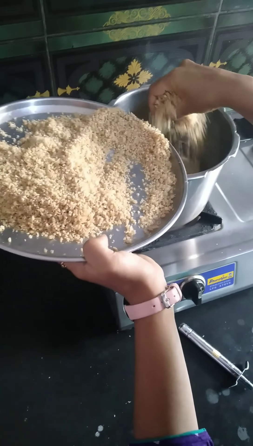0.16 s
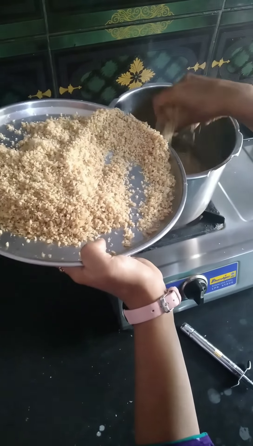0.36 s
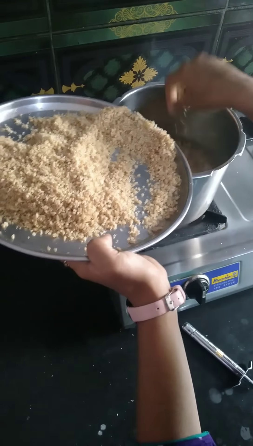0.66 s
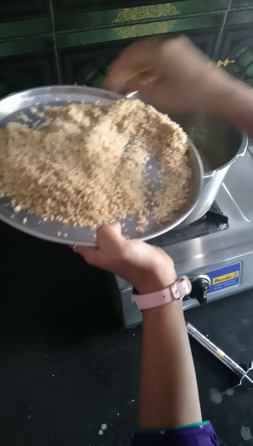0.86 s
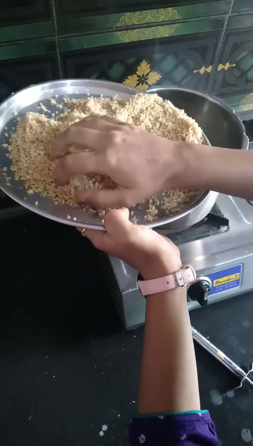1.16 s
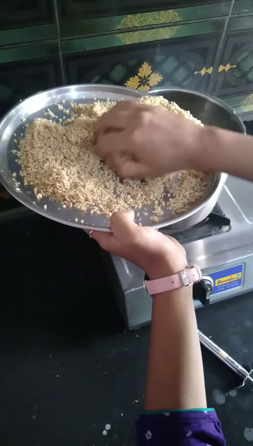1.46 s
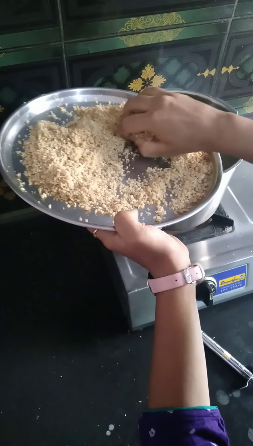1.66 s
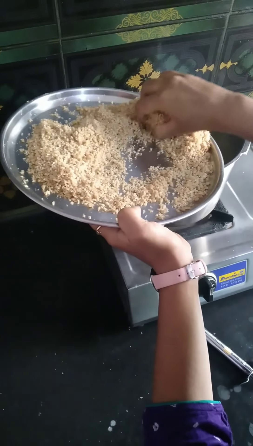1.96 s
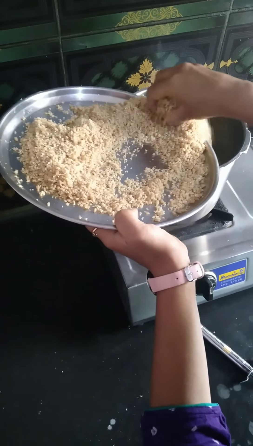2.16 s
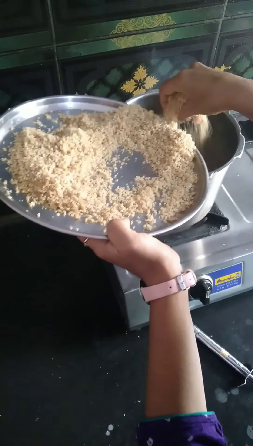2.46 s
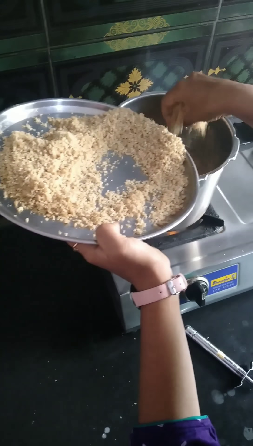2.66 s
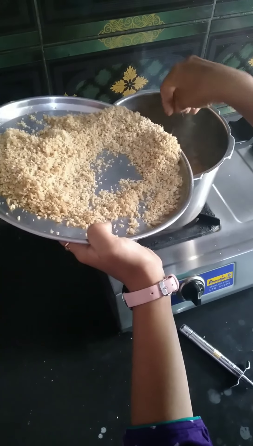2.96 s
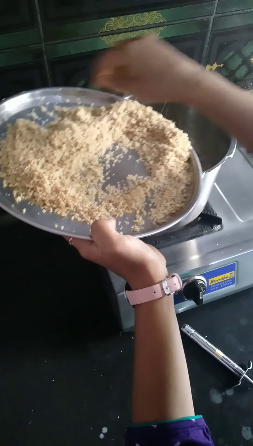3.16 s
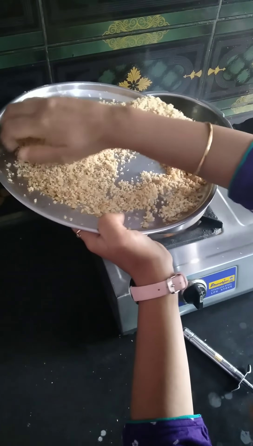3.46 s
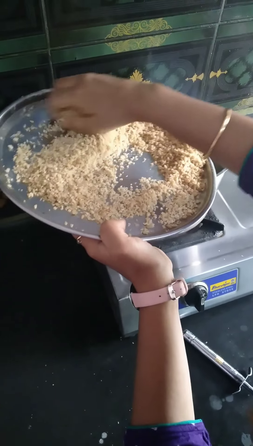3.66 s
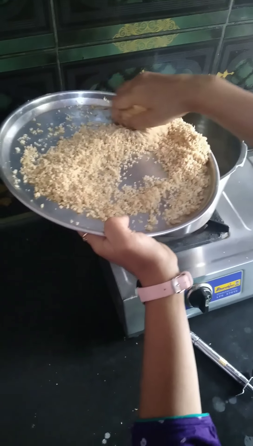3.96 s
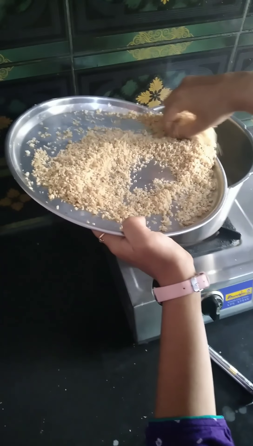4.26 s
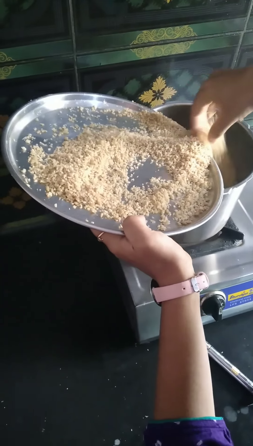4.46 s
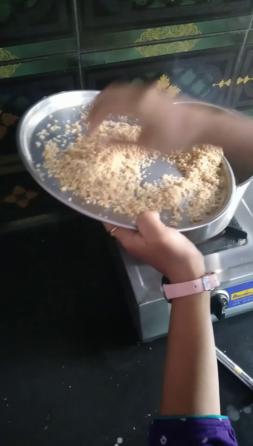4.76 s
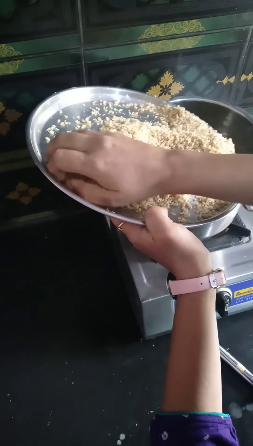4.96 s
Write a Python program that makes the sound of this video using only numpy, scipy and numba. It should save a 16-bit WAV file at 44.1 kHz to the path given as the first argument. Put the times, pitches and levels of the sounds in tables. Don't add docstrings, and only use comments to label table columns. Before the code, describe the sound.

Coarse grain is pushed by hand off a steel plate into a pot of water, fizzing brightly, with scraping fingers and hard metallic knocks.

```python
import sys
import numpy as np
from scipy import signal
from scipy.fft import rfft, irfft, next_fast_len
from scipy.io import wavfile
from scipy.ndimage import uniform_filter1d
from numba import njit

SR = 44100
rng = np.random.default_rng(int(sys.argv[2]) if len(sys.argv) > 2 else 0)


def nominal_scale(level):
    x = np.asarray(level, float) / 20
    return 10 ** x


def persist_wave(psi):
    counts = np.round(np.clip(psi, -1, 1) * 32767).astype(np.int16)
    wavfile.write(sys.argv[1], SR, np.atleast_2d(counts).T)


N = 225457
T = np.arange(N) / SR
PORT_LAG = 9
SIDES = np.array([[1], [-1]])


def level(x, db):
    return x * nominal_scale(db) / np.sqrt(np.mean(x ** 2))


def decay(t, t60):
    return np.exp(-np.log(1000) * t / t60)


def burst(s, db, rise_s, fall_s):
    return nominal_scale(db - 20 * np.where(T < s, (s - T) / rise_s, (T - s) / fall_s))


def walk(rate_hz):
    k = int(SR / rate_hz)
    steps = np.repeat(rng.standard_normal(N // k + 1), k)
    return 1.3 * uniform_filter1d(uniform_filter1d(steps, k), k)[:N]


def band(x, hz, width_hz):
    hz = min(hz, .45 * SR)
    return signal.lfilter(*signal.iirpeak(hz, hz / width_hz, fs=SR), x)


@njit
def moving_band(x, hz, width_hz):
    y, b, l = np.empty(len(x)), 0., 0.
    for i in range(len(x)):
        g, k = np.tan(np.pi * hz[i] / SR), width_hz[i] / hz[i]
        v = (b + g * (x[i] - l)) / (1 + g * (g + k))
        b, l, y[i] = 2 * v - b, l + 2 * g * v, k * v
    return y


def colour(x, table):
    hz, db = np.transpose(table)
    size = next_fast_len(N)
    log_f = np.log(np.arange(size // 2 + 1) * SR / size + 1)
    return irfft(rfft(x, size) * nominal_scale(np.interp(log_f, np.log(hz), db)), size)[..., :N]


def ring(modes, size):
    t, out = T[:size], 0
    for hz, db, t60 in modes:
        strength = nominal_scale(db + 1.5 * rng.standard_normal())
        out = out + strength * np.sin(2 * np.pi * hz * t) * decay(t, t60)
    return out


@njit
def add_bubbles(out, start, hz, cycles, size, glide):
    for j in range(len(start)):
        w, phase, a = 2 * np.pi * hz[j] / SR, 0., size[j]
        fade = np.exp(-hz[j] / SR / cycles[j])
        for i in range(start[j], min(len(out), start[j] + int(5 * cycles[j] * SR / hz[j]))):
            phase += w
            w, a = min(w * (1 + glide * hz[j] / SR / cycles[j]), 2.8), a * fade
            out[i] += a * np.sin(phase)


def bubbles(low_hz, high_hz, cycles, spread_db, glide, apart, count):
    out, r = np.zeros(N), rng.random((count, 4))
    start = (r[:, 0] * N).astype(np.int64)
    hz = low_hz * (high_hz / low_hz) ** r[:, 1]
    biggest = np.minimum(-np.log(1 - r[:, 3]), 4.5)
    add_bubbles(out, start, hz, cycles * (.5 + r[:, 2]), nominal_scale(spread_db * biggest), glide)
    own = np.array([np.roll(out, N // 3), np.roll(out, -N // 3)])
    return level(np.array([np.roll(out, PORT_LAG), out]) + apart * own, 0)


# f [Hz], density [dB per Hz]
FIZZ = [(1760, -33), (3000, -11), (3260, -13), (3620, -15), (6170, -5), (8520, 5.5), (11400, -3.5),
        (15100, -3), (16000, -17)]
# t [s], flow level [dB], share of coarse lumps [dB]
FLOW = [(0.0, -35.5, -10), (0.42, -33.5, -12), (0.55, -39, -9), (0.61, -32, -15), (0.76, -45, -8),
        (0.9, -51, -7), (1.95, -49.5, -8), (2.11, -43, -6), (2.2, -33, -10), (2.78, -39, -8),
        (2.91, -34, -14), (3.1, -50, -20), (3.5, -50, -6), (3.75, -44, -14), (4.08, -48, -11),
        (4.25, -38, -7), (4.5, -31.5, -9), (4.8, -50, -5)]
# t [s], peak level [dB], 20 dB rise [s], 20 dB fall [s]
SPURTS = [(.0, -34, .05, .08), (.075, -36, .05, .05), (.32, -37, .05, .06), (1.122, -41, .004, .1),
          (1.57, -49, .2, .2), (2.39, -37, .05, .15), (2.9, -36, .06, .06), (3.73, -41, .12, .14),
          (3.84, -35, .06, .06), (4.155, -39, .03, .15), (4.2, -37, .02, .15), (4.33, -31, .004, .3),
          (4.61, -37, .04, .12), (4.84, -30, .004, .12), (5.11, -44, .15, .1)]


def shower():
    s, flow_db, lump_db = np.transpose(FLOW)
    pour_db = np.interp(T, s, flow_db)
    flow = np.sqrt(nominal_scale(2 * pour_db) + sum(burst(*spurt) ** 2 for spurt in SPURTS))
    shake = sum(burst(knock[0], knock[1], .005, .15) for knock in KNOCKS)
    heavy = np.clip((pour_db + 49) / 11, 0, 1)
    lumpy = np.clip((pour_db + 53.5) / 9, 0, 1)

    fizz = bubbles(low_hz=2860, high_hz=15600, cycles=1.37, spread_db=3.6, glide=.1, apart=1.2, count=14000)
    fizz = level(colour(fizz, FIZZ), -0.7) * nominal_scale(1.7 * walk(40))

    large = bubbles(low_hz=1700, high_hz=5390, cycles=2.97, spread_db=3.3, glide=.178, apart=1.1, count=5000)
    lumps = flow * nominal_scale(np.interp(T, s, lump_db) + 2.0) + nominal_scale(-28) * shake
    large = large * lumps * nominal_scale(2.73 * walk(30))

    slosh = bubbles(low_hz=582, high_hz=1916, cycles=2.7, spread_db=4.0, glide=.146, apart=1.1, count=3000)
    slosh = slosh * (heavy * nominal_scale(-55) + nominal_scale(-22) * shake) * nominal_scale(2.2 * walk(15))

    patter = rng.standard_normal(N) * nominal_scale(3.0 * walk(30))
    drum = signal.fftconvolve(patter, ring(STEEL[:11], size=SR // 2))[:N]
    drum = level(drum, 0) * (heavy * nominal_scale(-53.5) + nominal_scale(-21.5) * shake)
    return flow * fizz + lumpy * large + slosh + drum


# start [s], end [s], level [dB], hollow under the hand from [Hz], to [Hz]
STROKES = [(.0, .3, -52, 1400, 1550), (.9, 1.27, -53.5, 1500, 1450), (1.2, 1.7, -52.5, 2950, 3800),
           (1.35, 1.9, -64, 1000, 900), (1.5, 1.67, -56, 1900, 1900), (1.69, 2.12, -50.5, 2250, 2600),
           (1.72, 2.14, -53.5, 3800, 4300), (3.22, 3.7, -54, 1400, 1550), (3.5, 3.75, -58, 3600, 2700),
           (3.85, 4.18, -59, 1000, 900), (4.08, 4.2, -51, 3100, 3400)]
# start [s], end [s], f [Hz], level [dB]
SQUEAKS = [
    (1.507, 1.585, 4100, -53),
    (1.595, 1.7, 4080, -54),
]


def fingers():
    out, hollow_hz = np.zeros(N), 850
    for start, end, db, from_hz, to_hz in STROKES:
        span = slice(int(start * SR), int(end * SR))
        along = np.clip((T[span] - start) / (end - start), 0, 1)
        hz = from_hz * (to_hz / from_hz) ** along
        rub = (rng.standard_normal(N) * nominal_scale(3.4 * walk(60)))[span]
        for place in (-.3, .3, 0):
            rub = moving_band(rub, hz + place * hollow_hz, np.full(len(hz), 0.6 * hollow_hz))
        press = np.abs(np.sin(np.pi * along)) ** .5
        out[span] += level(rub, db) * press
    for start, end, hz, db in SQUEAKS:
        touch = np.clip(np.minimum(T - start, end - T) / .015, 0, 1)
        out += level(band(rng.standard_normal(N), hz, 22.0), db) * touch
    return out


# t [s], peak level [dB], brightness [dB], rattle of the heap [dB]
KNOCKS = [(0.376, -26.5, -20, 19.5), (1.909, -25.5, -18, 22), (2.325, -33, -12, 14),
          (2.457, -38.5, -12, 19), (2.899, -37.5, -35, 20), (2.982, -42.5, -35, 4), (3.078, -39, -31, 24),
          (3.092, -38, -31, 24), (3.18, -39, -24, 24), (3.235, -43, -30, 22), (3.722, -35.5, -13, 23),
          (4.325, -16, -13, 15), (4.565, -33.5, -31, 18), (4.613, -26, -32, 19), (4.659, -30, -23, 20),
          (4.787, -34.5, -43, 23), (4.835, -16, -12, 13), (4.974, -40, -7, 26)]
# f [Hz], level [dB], t60 [s]
STEEL = [(235.8, -10, 0.3), (259.8, -5.5, 0.3), (318, -11, 0.3), (465, -14, 0.25), (487, -9, 0.3),
         (518, -1, 0.25), (534.7, 3.5, 0.42), (564.2, 0.5, 0.3), (651, -8, .2), (765, -13, 0.25),
         (903, -3, 0.14), (1170, -7, 0.2), (1486, -5.5, 0.11), (2100, 2, 0.13)]


def knocks():
    out, t = np.zeros(N), T[:SR // 2]
    push = np.hanning(9)
    for s, db, bright_db, heap_db in KNOCKS:
        tilt_db = (bright_db + 22) / 3
        modes = [(hz, mode_db + tilt_db * np.log2(hz / 600), t60) for hz, mode_db, t60 in STEEL]
        heap = band(band(rng.standard_normal(len(t)), 750, 1000.), 600, 1200.) * decay(t, .2)
        body = np.convolve(ring(modes, size=len(t)) + nominal_scale(heap_db) * heap, push)
        i = int(s * SR)
        body = body[:N - i] / np.abs(body).max()
        out[i:i + len(body)] += nominal_scale(db + 5.0) * body
    return signal.sosfilt(signal.butter(2, 190, "high", fs=SR, output="sos"), out)


# t [s], peak level [dB], tail t60 [s], left minus right [dB]
TICKS = [(.136, -20, .05, -7), (.641, -19, .04, -6), (0.789, -30, .08, -12), (.904, -35, .05, 0),
         (1.1192, -21, 0.17, 3), (1.912, -27.5, 0.29, 0), (2.0038, -29, .1, 0), (2.1772, -22, .06, -5),
         (2.2445, -26, .02, -2), (2.3675, -24, .08, -8), (2.4018, -19, .08, -3), (2.9013, -21.5, .15, -5),
         (3.7304, -30, 0.18, 4), (3.8217, -30, 0.28, 7), (3.935, -35, .06, 0), (4.0867, -31, 0.23, 7),
         (4.1958, -22, .08, 2), (4.252, -31, .06, 0), (4.3263, -10, 0.36, 3.5), (4.8369, -10.5, 0.38, 2)]
# f [Hz], level [dB], t60 [s]
RIM = [(4400, 7, .06), (5770, 5, 0.086), (6400, -4, 0.26), (7640, 3, 0.16), (8340, 11.5, 0.059)]


def ticks():
    out, t = np.zeros((2, N)), T[:SR // 3]
    for s, db, tail_s, pan_db in TICKS:
        crack = np.exp(-t / .0016) + nominal_scale(-12.5) * decay(t, tail_s)
        noise = rng.standard_normal((2, len(t))) * crack
        bright = band(band(noise, 7500, 3300.0), 7500, 3300.0)
        broad = band(band(noise, 5000, 6000.), 4700, 7000.)
        hit = 1.49 * bright + nominal_scale(-9.5) * broad + nominal_scale(-27) * ring(RIM, size=len(t))
        i = int(s * SR)
        out[:, i:i + len(t)] += (nominal_scale(db + SIDES * pan_db / 2) * hit)[:, :N - i]
    return out


# t [s], peak level [dB], f [Hz]
PLOPS = [
    (2.1849, -29, 2070),
    (2.415, -36, 1150),
    (4.1964, -22, 2220),
    (4.2064, -25, 2480),
    (4.2184, -30, 2260),
    (4.4894, -33, 1780),
]


def plops():
    out = np.zeros(N)
    s, db, hz = np.transpose(PLOPS)
    add_bubbles(out, (s * SR).astype(np.int64), hz, np.full(len(s), 7.), nominal_scale(db + 5), .03)
    return out


# t [s], level [dB]
MOTOR = [
    (0.0, -49),
    (.6, -56),
    (.8, -48),
    (1.7, -47),
    (2.2, -62),
    (5.11, -66),
]
# t [s], level [dB]
BOOMS = [(0.0, -46), (.5, -46), (.68, -45), (1.0, -50), (1.93, -46), (2.3, -49), (2.45, -48), (2.75, -49),
         (2.92, -44), (3.5, -48), (4.42, -50), (5.0, -51)]
# f [Hz], width [Hz], level [dB]
HUM = [(50.3, 1, -52.5), (146.7, 6.6, -55), (221.5, 5.8, -59.5), (352, 16, -65), (3646, 53, -68),
       (4650, 60, -63.5), (6230, 200, -95)]


def hum():
    motor = nominal_scale(np.interp(T, *np.transpose(MOTOR)))
    boom = nominal_scale(-55) + sum(nominal_scale(db) * np.exp(-((T - s) / .07) ** 2) for s, db in BOOMS)
    out = 0
    for hz, wander_hz, size in ((60.2, 1.2, motor), (103.1, 3.5, boom)):
        phase = 2 * np.pi * np.cumsum(hz + wander_hz * walk(6)) / SR
        out = out + size * nominal_scale(1.8 * walk(12)) * np.sin(phase + np.array([[0], [.6]]))
    for hz, width_hz, db in HUM:
        mid, side = band(rng.standard_normal((2, N)), hz, width_hz)
        out = out + level(mid + np.clip(hz / 1000, .3, 1) * side * SIDES, db)
    return out


# f [Hz], density [dB per Hz]
AIR = [(18, -30), (30, -7.5), (131, -10.5), (449, -9), (740, -21), (1670, -28), (1960, -31), (3670, -47),
       (4190, -57), (4530, -68), (5590, -21), (8980, -3.5), (10500, -9.5), (12000, -86), (16000, -67)]


def air():
    out = 0
    for hz in 30 * 2 ** np.arange(0, 9.1, 1 / 5):
        mid, side = band(rng.standard_normal((2, N)), hz, hz / 8)
        patchy_db = 1.5 + 6.5 * np.exp(-np.log2(hz / 3200) ** 2 / 1.4)
        wide = mid + np.clip(hz / 800, .42, 1) * side * SIDES
        out = out + nominal_scale(patchy_db * walk(8.5)) * wide / np.sqrt(hz)
    return level(colour(out, AIR), -47)


# f [Hz], t60 [s]
KITCHEN = [(250, 0.39), (1000, 0.4), (4000, 0.36), (9000, 0.2)]


def ports(x, wet_db):
    t, tails = T[:SR // 2], 0
    for hz, t60 in KITCHEN:
        mid, side = rng.standard_normal((2, len(t)))
        pair = band(mid + min(hz / 1320.0, 1) * side * SIDES, hz, 0.87 * hz)
        tails = tails + pair * decay(t, t60) * np.clip(t / 0.001, 0, 1)
    tails = nominal_scale(wet_db) * tails / np.sqrt(np.sum(tails ** 2) / 2)
    direct = x if x.ndim > 1 else np.array([np.roll(x, PORT_LAG), x])
    return direct + signal.fftconvolve(direct, tails, axes=1)[:, :N]


def scene():
    close = ports(shower(), wet_db=-2.5) + ports(fingers() + plops(), wet_db=-2.5)
    plate = ports(knocks(), wet_db=-5)
    return close + plate + ticks() + hum() + air()


# f [Hz], level per band [dB]
GATE = [(300, -100), (620, -74), (750, -72), (1100, -93.5), (2000, -76.5), (3200, -75.5), (5000, -72.5),
        (7000, -70), (10300, -88), (10900, -75.5), (16000, -78.5)]


def gate_bands(x):
    f, _, z = signal.stft(x, SR, nperseg=1024, noverlap=768)
    power = uniform_filter1d(np.mean(np.abs(z) ** 2, axis=0), size=9, axis=1)
    power = uniform_filter1d(power, size=2, axis=0)
    hz, db = np.transpose(GATE)
    gate_db = np.interp(np.log(f + 1), np.log(hz), db)
    over = (power / nominal_scale(2 * gate_db)[:, None]) ** 2.5
    gain = np.clip(over / (1 + over), nominal_scale(-38), 1)
    return signal.istft(z * gain, SR, nperseg=1024, noverlap=768)[1][:, :N]


def roll_off(x):
    return signal.sosfilt(signal.butter(12, 16990, fs=SR, output="sos"), x)


# f [Hz], left minus right [dB]
PORTS = [(60, 2.0), (110, 2.5), (200, 1.0), (380, 1.0), (700, -1), (1290, 0), (2380, 1.5), (4400, 3),
         (8120, -1.5), (15000, -1.5)]
# f [Hz], width [Hz], gain [dB]
DIPS = [(3250, 330, -5.5), (5430, 330, -1.5)]


def record(dry):
    hz, db = np.transpose(PORTS)
    x = np.array([colour(c, np.transpose([hz, s * db / 2])) for c, s in zip(dry, (1, -1))])
    for dip_hz, width_hz, dip_db in DIPS:
        x = x - (1 - nominal_scale(dip_db)) * band(x, dip_hz, width_hz)
    x = signal.sosfilt(signal.butter(4, 42, "high", fs=SR, output="sos"), x)
    x = signal.sosfilt(signal.ellip(8, .2, 60, 16000, fs=SR, output="sos"), x)
    x = gate_bands(x)
    return roll_off(x)


dry = scene()
out = record(dry)
persist_wave(out)
```